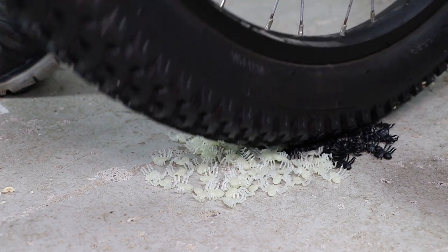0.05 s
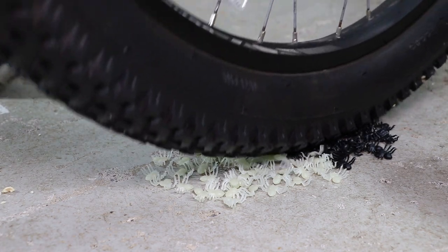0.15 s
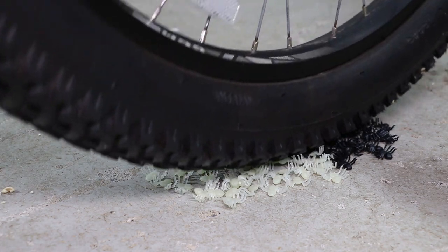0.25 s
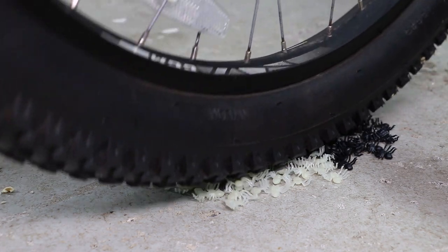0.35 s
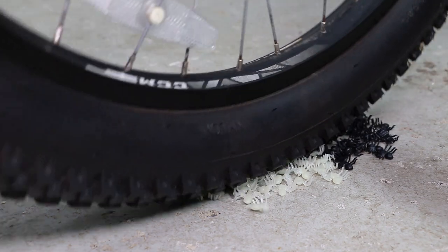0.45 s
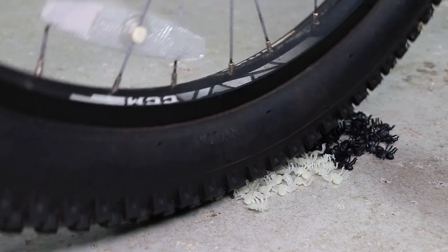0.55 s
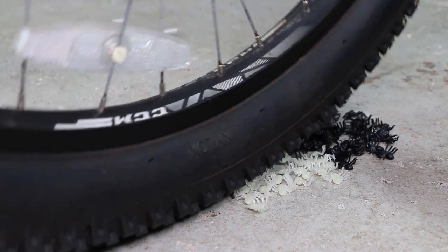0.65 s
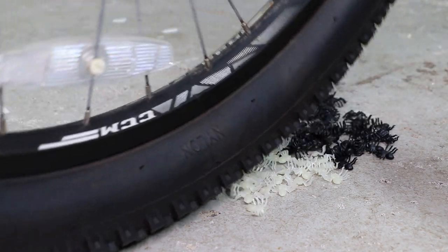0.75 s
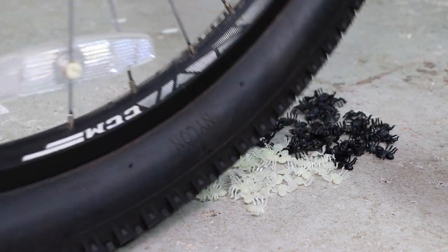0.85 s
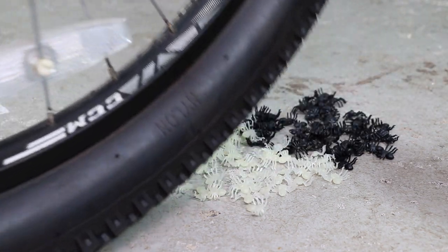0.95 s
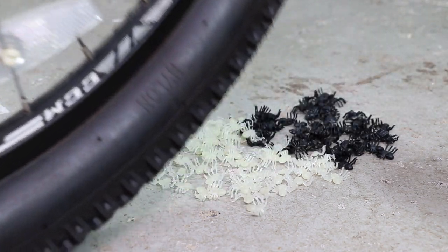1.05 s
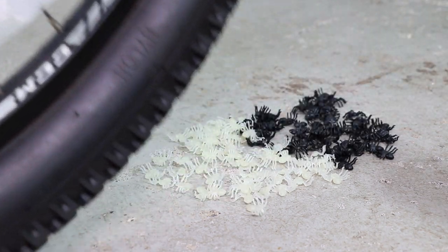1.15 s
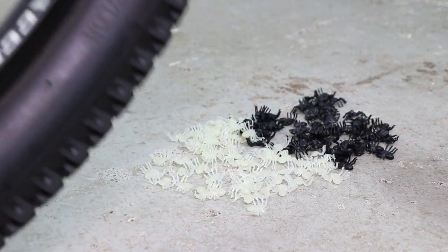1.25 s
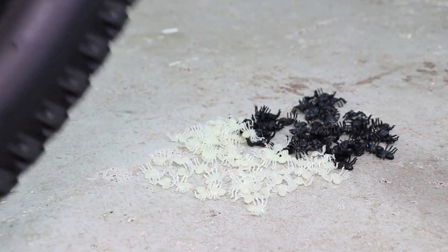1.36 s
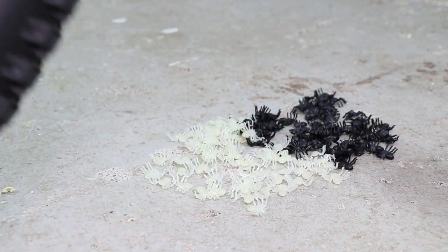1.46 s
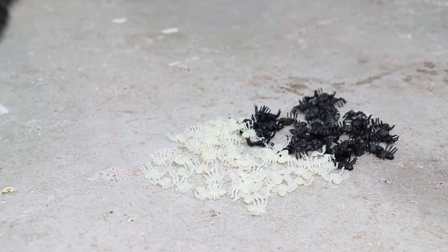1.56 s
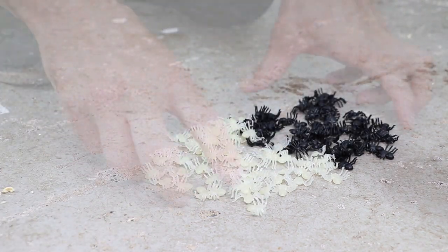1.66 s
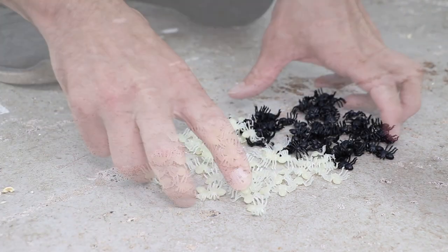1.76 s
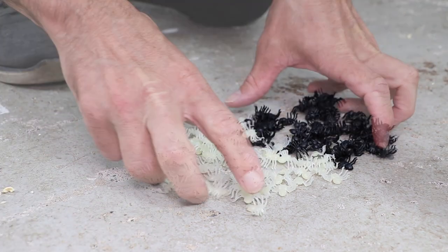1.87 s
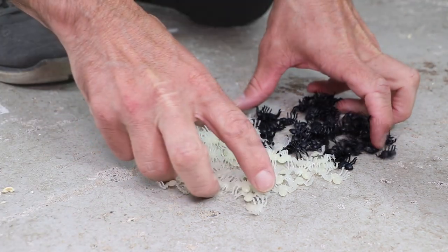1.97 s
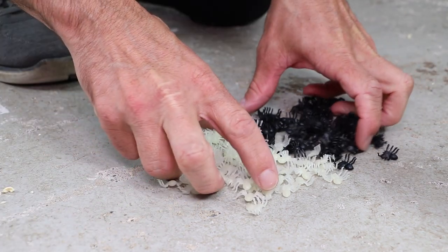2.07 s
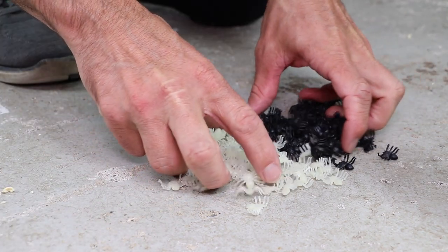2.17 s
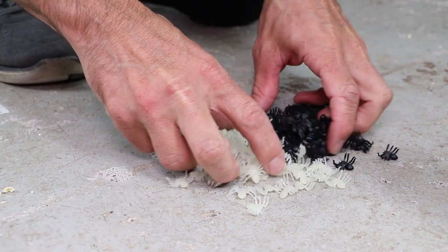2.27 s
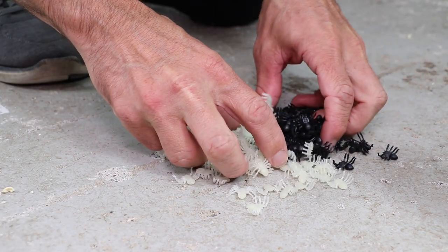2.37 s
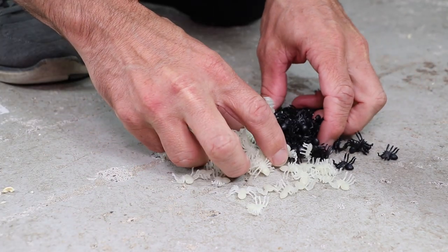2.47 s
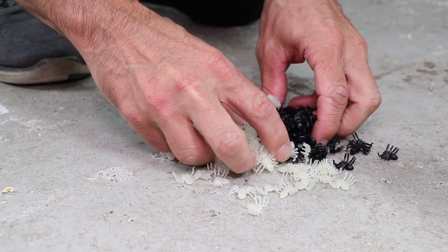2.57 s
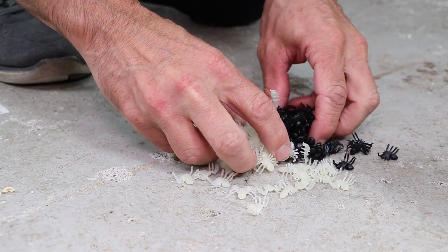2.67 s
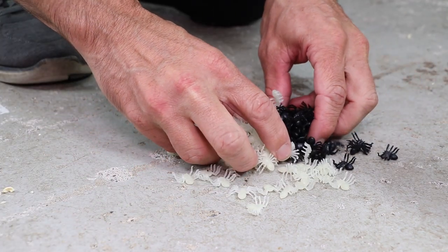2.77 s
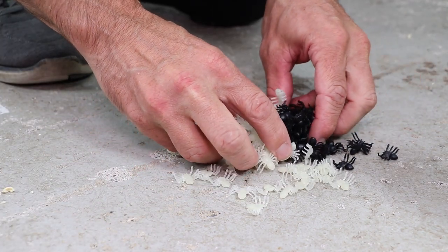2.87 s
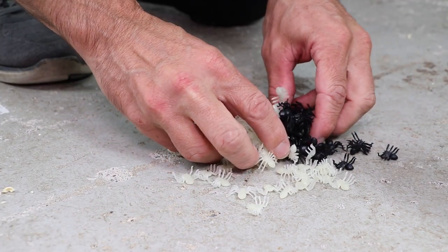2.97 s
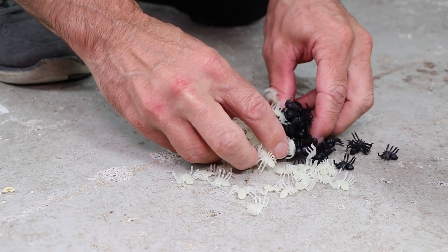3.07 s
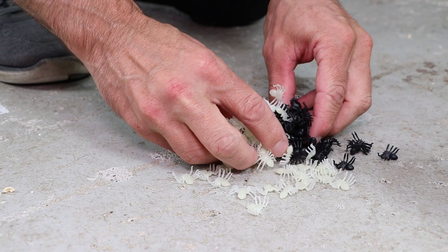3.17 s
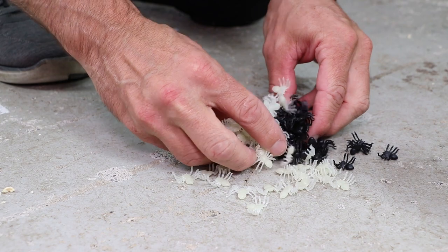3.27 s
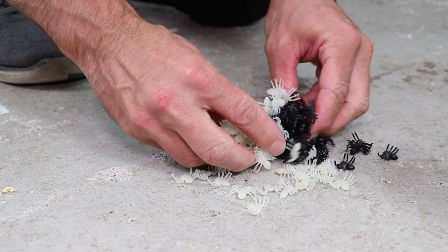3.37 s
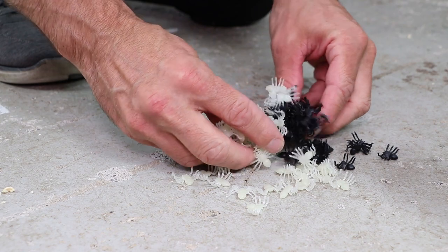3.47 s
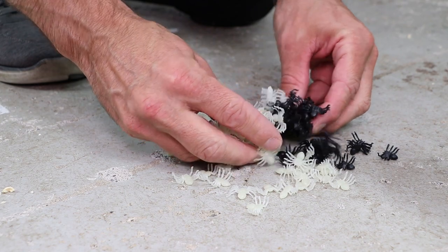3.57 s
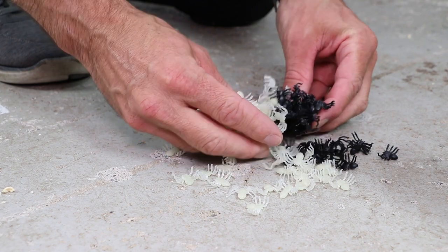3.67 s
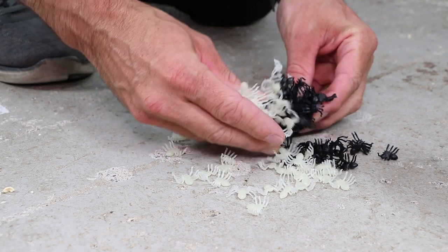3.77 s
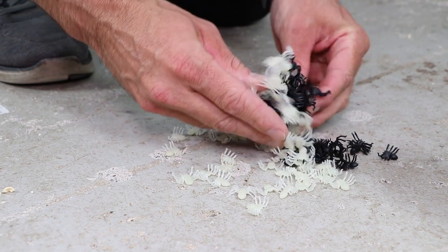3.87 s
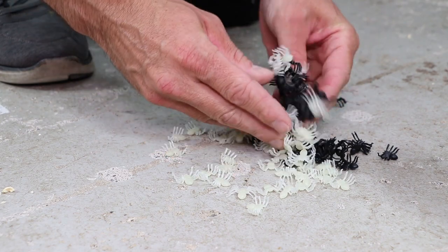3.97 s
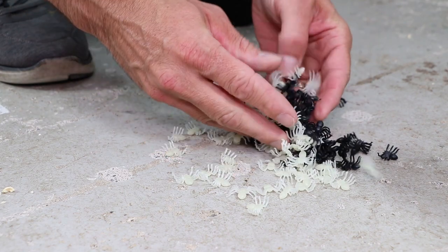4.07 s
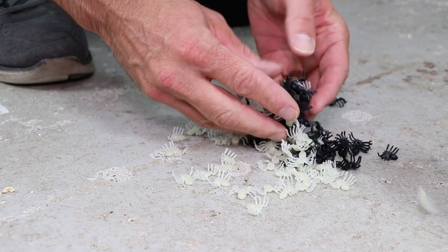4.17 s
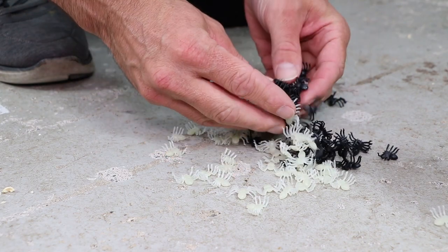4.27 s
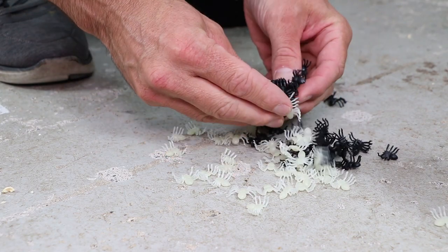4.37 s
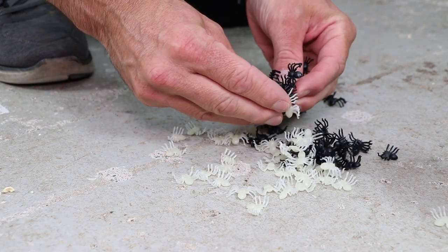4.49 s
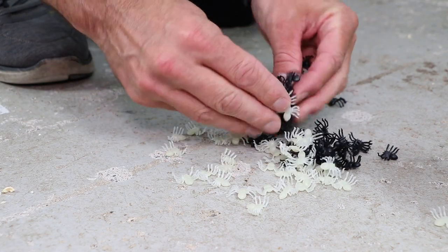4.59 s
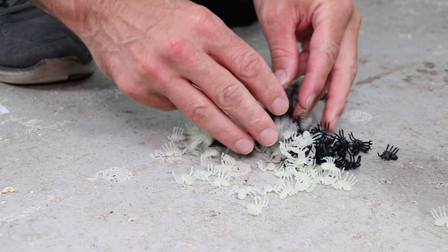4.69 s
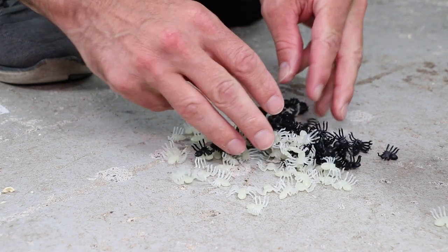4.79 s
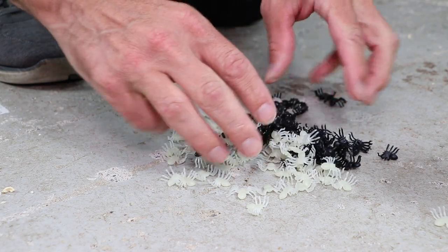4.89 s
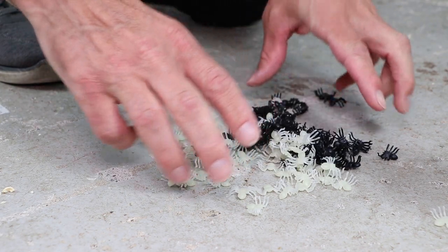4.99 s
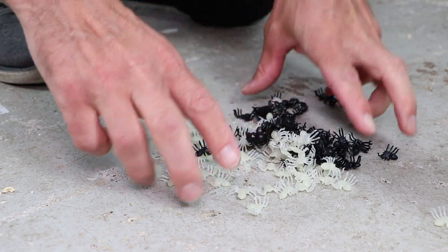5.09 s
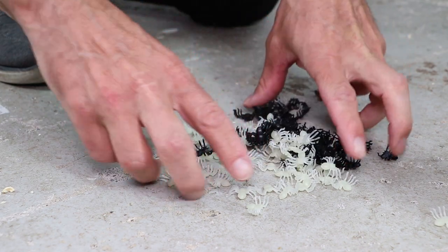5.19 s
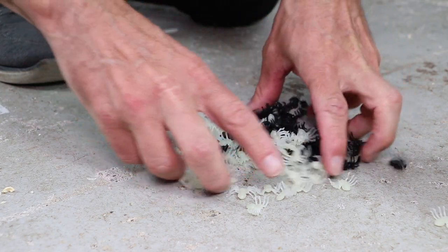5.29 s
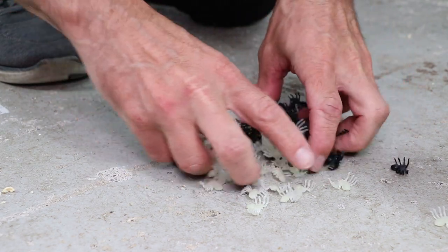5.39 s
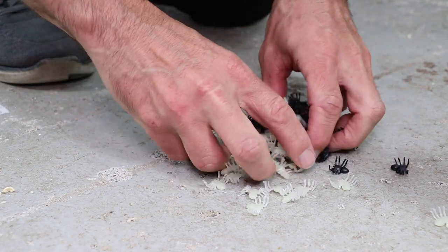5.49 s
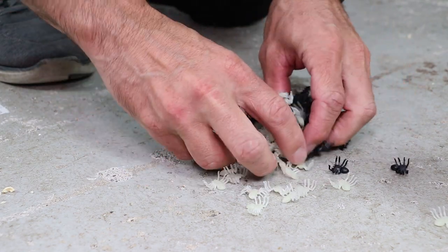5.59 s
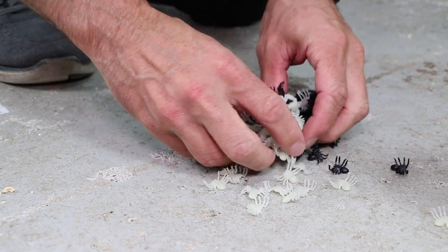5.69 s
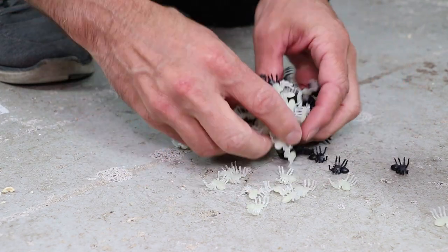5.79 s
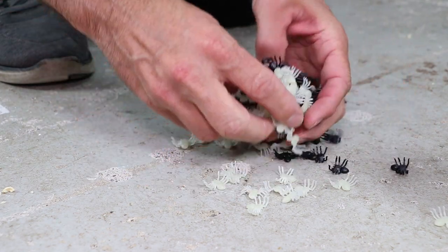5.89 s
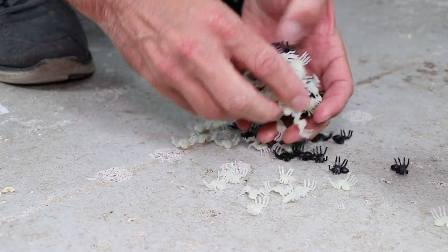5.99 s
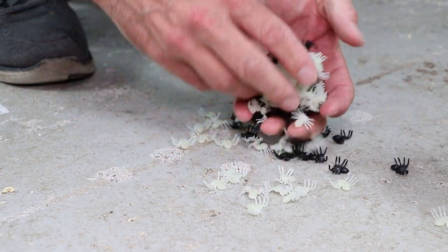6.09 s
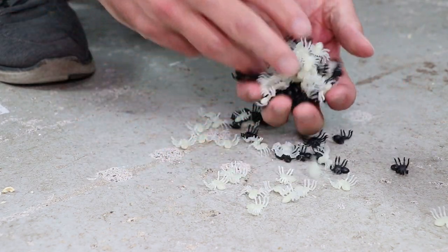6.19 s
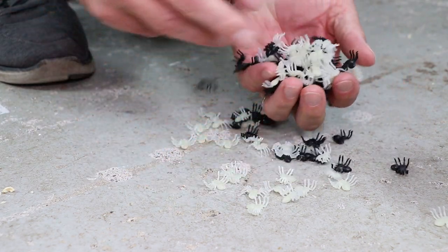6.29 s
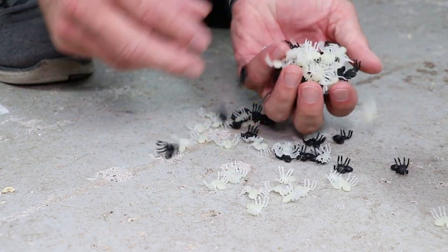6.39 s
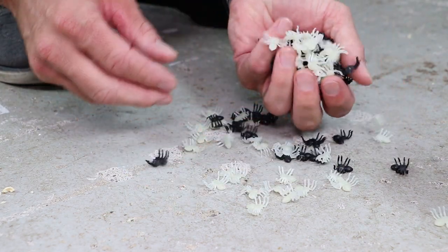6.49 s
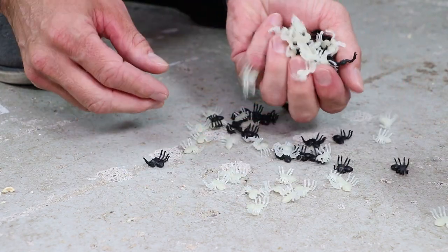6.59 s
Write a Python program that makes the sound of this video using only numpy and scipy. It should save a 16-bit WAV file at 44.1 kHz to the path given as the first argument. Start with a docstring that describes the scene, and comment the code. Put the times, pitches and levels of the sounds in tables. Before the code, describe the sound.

Sharp plastic snaps and gritty crackle under a rolling tyre give way to soft scuffs and bright clicking rustles as fingers gather little toys.

```python
"""Small hard plastic toys snap and grit crackles as a bicycle tyre rolls over a heap of them on a concrete floor.
Then two hands land with soft scuffs and, stroke by stroke, rake the toys together, lift them and let some drop.
A close stereo microphone hears it in a quiet room with a faint hum.
Clicks are short random resonances; grit, rustle and scrape are streams of tiny clicks; rub, scuff,
rumble and air are coloured noise; thumps, squeak and hum are sines."""
import sys
import numpy as np
from scipy import signal
from scipy.fft import rfft, irfft
from scipy.io import wavfile
from scipy.ndimage import uniform_filter1d

SR = 44100
rng = np.random.default_rng(int(sys.argv[2]) if len(sys.argv) > 2 else 0)


def digitize_waveform(pressure):
    """Quantize a signal to 16-bit integers and store it at the path in sys.argv[1].

    Rows of a 2-D input are taken as channels; values are limited to [-1, 1].
    """
    field = np.atleast_2d(pressure).T
    bounded = np.clip(field, -1, 1)
    quanta = np.round(bounded * 32767).astype(np.int16)
    wavfile.write(sys.argv[1], SR, quanta)


N = 293265
TAPS = 1024  # length of a click's spectrum in samples; the click itself lasts half of it
HZ = np.fft.rfftfreq(TAPS, 1 / SR)
TIME = np.arange(N) / SR


def amp(db):
    """Decibels to gain."""
    return 10 ** (np.asarray(db) / 20)


def evened(x):
    """Scales to rms 1."""
    return x / np.sqrt(np.mean(x ** 2) + 1e-20)


def read(points, hz):
    """Reads a table on a log-frequency axis."""
    f, value = np.transpose(points)
    return np.interp(np.log(hz + 1), np.log(f + 1), value)


def level(table, order):
    """Gain over time from one dB column of a curve; silent outside it."""
    rows = np.array(table)
    return amp(np.interp(TIME, rows[:, 0], rows[:, order], left=-np.inf, right=-np.inf))


def swell(start, length, rise_s, fall_s):
    """One push over time: it builds up, holds until its length is over, then dies away."""
    t = TIME - start
    return np.clip(t / rise_s, 0, 1) * np.exp(-np.maximum(t - length, 0) / fall_s)


def pushes(table, rise_s, fall_s, order):
    """Gain over time from one dB column of a table of pushes; the strongest one leads."""
    return np.max([amp(row[order]) * swell(row[0], row[1], rise_s, fall_s) for row in table], axis=0)


def clumps(depth_db, span_s):
    """Contacts come in small avalanches: a gain of rms 1 that swells and drops within span_s."""
    window = signal.windows.hann(int(np.clip(span_s * SR, 16, 8000)))
    wander = evened(signal.oaconvolve(rng.standard_normal(N), window, "same"))
    return evened(amp(depth_db * np.clip(wander, -2, 2)))


def add(mix, s, sound):
    """Mixes a stereo sound in at s seconds."""
    part = mix[:, max(round(s * SR), 0):][:, :sound.shape[1]]
    part += sound[:, :part.shape[1]]


def bump(hz, centre_hz, octaves):
    """Bell curve of height 1 round a resonance."""
    return np.exp(-(np.log2((hz + 1) / centre_hz) / octaves) ** 2)


def ripple(size):
    """Random peaks and dips along the spectrum, size bins wide."""
    return evened(uniform_filter1d(uniform_filter1d(rng.standard_normal(len(HZ)), size), size))


def noise(colour, likeness):
    """Stereo noise of rms 1; likeness is the share of its power common to both microphone ports."""
    hz = np.fft.rfftfreq(N, 1 / SR)
    common = np.sqrt(likeness) * rng.standard_normal(N)
    separate = np.sqrt(1 - likeness) * rng.standard_normal((2, N))
    return evened(irfft(rfft(common + separate) * amp(read(colour, hz)), N))


# How the close stereo microphone hears a click, left port over right. Each row: frequency in Hz, level in dB.
PORT_BALANCE = [(200, 16.5), (500, 4), (1200, 3), (2500, 0), (3500, 0), (4300, 0), (5200, -1), (6000, 6.5),
                (7200, -6.5), (8700, 4), (10500, -0.5), (12500, 4.5), (15500, -6)]
# Phase by which the left port leads. Each row: frequency in Hz, lead in radians.
PORT_LEAD = [(20, 2.2), (1000, 1.13), (2800, 0.59), (4200, 2.87), (5700, 0.63), (7600, 3.3), (10000, 4.33),
             (13000, 4.76), (15500, 7)]


def tick(colour_db, pan_db, modes_db=6.0, path_db=2.0):
    """One causal click of energy 1: the toy's own random modes, then a slightly different path to each port."""
    side = np.array([[.5], [-.5]])
    paths = np.array([ripple(size=18), ripple(size=18)])
    db = colour_db + modes_db * ripple(size=14) + path_db * paths
    db = db + side * (pan_db + read(PORT_BALANCE, HZ))
    # minimum phase: the energy comes as early as the spectrum allows
    log_gain = np.log(amp(np.concatenate([db, db[:, -2:0:-1]], axis=1)))
    spectrum = np.exp(np.conj(signal.hilbert(log_gain)))[:, :len(HZ)]
    spectrum = spectrum * np.exp(1j * side * read(PORT_LEAD, HZ))
    # the lead can place some sound ahead of time zero, so start 4 samples later
    wave = np.roll(irfft(spectrum), 4, axis=1)[:, :TAPS // 2]
    return wave / np.sqrt(np.sum(wave ** 2) / 2)


def grains(colour, per_s, spread_db, pan_db, scatter_db, modes_db=6.5, count=24):
    """Countless tiny contacts of random size, each from one of count differently ringing toys; rms 1."""
    out, colour_db = np.zeros((2, N)), read(colour, HZ)
    for place in np.linspace(-1.7, 1.7, count):
        at = np.flatnonzero(rng.random(N) < per_s / count / SR)
        sizes_db = spread_db * np.minimum(rng.exponential(1, len(at)), 3)
        train = np.zeros(N)
        train[at] = amp(sizes_db) * (-1) ** at  # odd samples push the other way
        click = tick(colour_db, pan_db + scatter_db * place, modes_db)
        out += signal.oaconvolve(train[None], click, axes=1)[:, :N]
    return evened(out)


def snap(colour, db, tilt, ring_hz, pan_db, rattle_db, ring_db, ring_octaves, rattle_s, slip_db, slip_s,
         rebound=0.27):
    """A thin plastic leg drags, slips free with a sharp click, rebounds and chatters; the click falls TAPS samples in."""
    tilt_db = tilt * np.log2(np.maximum(HZ, 600) / 5000)
    colour_db = read(colour, HZ) + tilt_db + ring_db * bump(HZ, ring_hz, ring_octaves)
    t = TIME[:3 * TAPS] - TAPS / SR
    contacts = rng.standard_normal(len(t)) ** 3
    slip = contacts * np.exp(-abs(t) / slip_s) * (t < 0)
    chatter = contacts * np.exp(-abs(t) / rattle_s) * (t > .0005)
    force = amp(slip_db) * slip / np.linalg.norm(slip)
    force = force + amp(rattle_db) * chatter / np.linalg.norm(chatter)
    wave = signal.fftconvolve(force[None], tick(colour_db, pan_db), axes=1)
    for delay_s, size in (0, 1), (rng.uniform(.00015, .0004), rebound):
        click = tick(colour_db, pan_db, modes_db=1.0, path_db=1.5)
        add(wave, TAPS / SR + delay_s, size / np.hypot(1, rebound) * click)
    return amp(db) * np.sqrt(SR / 1000) * wave  # energy 1 becomes rms 1 over 1 ms


def soften(x, strength, full_db, slope, split_hz):
    """Gentle contacts last longer and so lose the treble above split_hz; those at full_db or more keep it."""
    hz = np.fft.rfftfreq(N, 1 / SR)
    top = irfft(rfft(x) / (1 + (split_hz / (hz + 1)) ** 12), N)
    return x - top * (1 - np.minimum(strength / amp(full_db), 1) ** slope)


# Still air of the quiet room. Each row: frequency in Hz, relative density in dB per Hz.
AIR_COLOUR = [(20, 8), (60, -2), (130, -5.5), (300, -11.5), (600, -16), (1200, -22.5), (4000, -27.5),
              (8000, -29), (10500, -30), (15000, -33.5)]


def background(air_db=-63.5, hum_hz=119, hum_db=-76):
    """Still air as coloured noise and a faint hum as one steady sine."""
    hum = np.sqrt(2) * np.sin(2 * np.pi * hum_hz * TIME)
    return amp(air_db) * noise(AIR_COLOUR, likeness=0.12) + amp(hum_db) * hum


# How fast the room dies away. Each row: frequency in Hz, time to fall by 60 dB in s.
ROOM_DECAY = [(150, 0.19), (1000, 0.25), (3000, 0.099), (8000, 0.069), (15000, 0.078)]


def room(x, wet_db=-15):
    """Sparse reflections of random sign, each band dying at its own speed."""
    size = SR // 2
    taps = rng.standard_normal((2, size)) * (rng.random((2, size)) < .1)
    taps = taps * (TIME[:size] > .003)
    hz, t, z = signal.stft(taps, SR, nperseg=256)
    decay = amp(-60 * t / read(ROOM_DECAY, hz)[:, None])
    tail = signal.istft(z * decay, SR, nperseg=256)[1]
    return amp(wet_db) * signal.fftconvolve(x, tail / np.linalg.norm(tail[0]), axes=1)[:, :N]


# Tread knobs, then fingertips, landing on the concrete.
# Each row: start in seconds, level in dB before the rise, decay and panning, ring in Hz.
LANDINGS = [(.172, -50, 137), (0.293, -49, 111), (.71, -52, 109), (.775, -49, 86), (.99, -45, 95),
            (1.059, -57, 75), (1.16, -52, 84), (1.245, -51, 100), (1.403, -41.5, 69.6), (1.889, -48.5, 146),
            (2.133, -54, 160), (2.235, -46, 132), (2.66, -42, 124), (2.829, -41.5, 134),
            (3.049, -47.5, 144), (5.211, -39.5, 112), (5.296, -38, 123), (5.388, -31.5, 112)]


def thumps(rise_s=0.0058, decay_s=0.019, lead_rad=1.6):
    """Each soft landing sets off a few dying low cycles, which reach the left port first."""
    out, t = np.zeros((2, N)), TIME[:8 * TAPS]
    for s, db, hz in LANDINGS:
        envelope = amp(db) * np.minimum(t / rise_s, 1) * np.exp(-t / decay_s)
        cycles = np.sqrt(2) * np.sin(2 * np.pi * hz * t - np.array([[0], [lead_rad]]))
        add(out, s, envelope * cycles)
    return out


# Dull bumps on the floor. Each row: start in seconds, level in dB, ring in Hz, decay in s.
DULL_BUMPS = [(.892, -45.5, 450, 0.0053), (.911, -52, 910, 0.011), (.9995, -55, 750, .005),
              (1.038, -50, 875, 0.009), (1.122, -51.5, 920, 0.013), (1.56, -61, 550, 0.069),
              (1.76, -56.5, 706, 0.04), (2.118, -47, 600, 0.012), (2.15, -49.5, 604, 0.027),
              (2.6, -67.5, 596, .03), (3.232, -53, 700, 0.01), (5.195, -48.5, 500, 0.02),
              (5.21, -54.5, 440, 0.073), (5.39, -41, 710, 0.011), (5.418, -43, 970, .016),
              (5.463, -47, 630, 0.024), (5.53, -54, 740, 0.077), (5.689, -47.5, 910, 0.0091),
              (6.046, -60, 960, 0.018), (6.192, -55.5, 1530, 0.006)]
# Soft colour of skin on concrete, also of the bumps. Each row: frequency in Hz, relative density in dB per Hz.
SCUFF_COLOUR = [(80, -13.5), (200, 6), (330, 1), (520, 0), (750, -4.5), (1100, -9), (2200, -15.5),
                (4000, -29)]


def dull_bumps(ring_db=14, blow=0.35):
    """A soft blow, then a short skid, rings a dull resonance."""
    out, t = np.zeros((2, N)), TIME[:8 * TAPS]
    for s, db, ring_hz, decay_s in DULL_BUMPS:
        colour_db = read(SCUFF_COLOUR, HZ) + ring_db * bump(HZ, ring_hz, 0.86)
        body = tick(colour_db, pan_db=-5.5, modes_db=1, path_db=4.5)
        skid = rng.standard_normal(len(t)) * np.exp(-t / decay_s)
        push = blow * (t == 0) + skid / np.linalg.norm(skid)
        wave = signal.fftconvolve(push[None], body, axes=1)
        add(out, s, amp(db) * evened(wave) * np.sqrt(decay_s * SR / len(t)))
    return out


# Low rumble under the tread, then under the hands. Each row: frequency in Hz, relative density in dB per Hz.
TREAD_COLOUR = [(20, -4.5), (45, -13.5), (80, 7.5), (105, 6), (145, -7), (200, -19), (350, -49),
                (1500, -50)]
RUMBLE_COLOUR = [(20, -2), (45, -5), (80, 3.5), (110, -3), (150, 3.5), (220, -41), (400, -17), (1500, -96)]


def floor_thuds(tread_db=3.0, rumble_db=-2, pan_db=8):
    """Tread, then leaning hands, load the concrete: rumble and thumps, stronger on the left, and dull bumps."""
    tread = amp(tread_db) * level(WHEEL_ROLL, order=3) * noise(TREAD_COLOUR, likeness=0.054)
    leaning = amp(rumble_db) * hand_weight() * noise(RUMBLE_COLOUR, likeness=0.074)
    low = (tread + leaning + thumps()) * amp([[pan_db / 2], [-pan_db / 2]])
    return low + dull_bumps()


def squeak(db=-57, waver=0.014):
    """The rubber sticks and slips in one short squeak: a sine of unsteady pitch."""
    start, length, pitch_hz = .812, .03, 1030
    drift = evened(uniform_filter1d(rng.standard_normal(N), size=130))
    hz = pitch_hz * (1 + waver * drift)
    envelope = amp(db) * swell(start, length, rise_s=.004, fall_s=.008)
    return envelope * np.sin(2 * np.pi * np.cumsum(hz) / SR)


# Toys snapping under the tyre. Each row: start in seconds, click level in dB over 1 ms,
# brightness in dB per octave, ring in Hz, left over right in dB.
TOY_CRACKS = [(0.0368, -34.5, 0, 3530, 8), (0.0421, -39, -8, 13200, 7.5), (0.073, -41, -4.5, 1200, 4),
              (0.0946, -34, -0.5, 1800, 7), (0.106, -29.5, -9, 11270, 1.5), (0.1239, -14, -1, 1850, 2),
              (0.17, -42, -5, 800, 12.5), (0.1795, -18, -5.5, 9500, 3.5), (0.2142, -23.5, -2.5, 1900, 0.5),
              (0.2265, -35.5, -5, 800, 5), (0.2385, -31, -6, 3770, -6), (0.247, -31.5, -5, 2680, 10),
              (0.288, -37, -2, 990, 0), (0.324, -30, -1.7, 1480, 0), (0.3865, -43, -1.5, 2500, 0),
              (0.4148, -32.5, -1.5, 1240, 0), (0.438, -35.5, -7.5, 8400, 9), (0.446, -29.5, -2, 3300, -2),
              (0.4737, -27, -3, 11500, 0), (0.5015, -32, -10, 5510, -4), (0.506, -23, 2.5, 800, -1),
              (0.5448, -28, 9, 4960, 6), (0.558, -28, -0.5, 2200, -4), (0.572, -48, 0.2, 7340, -8),
              (0.5772, -26.5, 13, 3130, -11), (0.582, -21.5, -1.5, 3550, -1.5), (0.637, -41, -9, 3550, -6),
              (0.7144, -37, -3.5, 1200, -4), (0.8612, -43.5, -5, 800, -7), (0.9998, -42.5, -14, 7340, -10),
              (1.0382, -35.5, -8, 860, -10), (1.122, -33, -5.5, 810, -12)]
# The wheel rolling over the heap and away. Each row: time in seconds, then grit, fine hiss
# and tread rumble in dB, all before the trims in the functions.
WHEEL_ROLL = [(0, -55.5, -60.5, -70.5), (.2, -53, -70, -59.5), (.4, -55, -57.5, -63.5),
              (.55, -53, -48, -59.5), (.68, -63, -60.5, -72), (.78, -56, -60, -59.5),
              (.96, -60.5, -66, -55.5), (1.1, -58, -62.5, -49), (1.35, -57, -57.5, -62.5),
              (1.46, -65, -64, -58.5), (1.72, -64.5, -60, -63.5), (1.85, -68, -74, -82)]
# Short swells of grit and crackle. Each row: start in seconds, length in s,
# grit in dB, fine crackle in dB, both before the trims.
GRIT_SWELLS = [(.105, 0.062, -51, -48.5), (.205, 0.029, -61, -47), (.43, 0.093, -56, -59),
               (.51, 0.015, -47.5, -53), (.63, 0.01, -54.5, -54), (.80, 0.017, -52.5, -55),
               (1.54, 0.043, -61, -55), (1.63, 0.011, -75, -51.5), (1.76, 0.0069, -54.5, -57.5)]
# Toys under the tread; beyond them the rubber only rubs on bare concrete. Each row: time in seconds, share 0-1.
TOY_SHARE = [(0, 0.98), (.6, 0.66), (.8, 0.52), (1.9, 0.02)]
# Colours of snapping toys, grit and fine crackle. Each row: frequency in Hz, relative density in dB per Hz.
CRACK_SPECTRUM = [(150, -39.5), (600, -18), (1000, -13.5), (1900, -2.5), (3000, -7), (4200, -9), (6000, 3),
                  (8300, 5), (10300, -6), (12500, -2.5), (15000, -4.5), (18000, -20)]
GRIT_COLOUR = [(200, -31.5), (380, -7.5), (560, -1.5), (800, -1.5), (1200, -1), (2000, -4.5), (3200, -8.5),
               (6000, -14), (15000, -28.5)]
CRACKLE_COLOUR = [(1500, -7.5), (3200, 4), (4500, 1.5), (7000, 2), (10000, -1.5), (15000, -12.5)]


def tyre(grit_db=-1.5, crackle_db=-2.5, chip_db=-3):
    """Toys crack one by one over crunching grit and small ticks of bending legs; then the rubber hisses on."""
    rise_s, fall_s = 0.017, 0.037
    coarse = np.hypot(level(WHEEL_ROLL, order=1), pushes(GRIT_SWELLS, rise_s, fall_s, order=2))
    fine = np.hypot(level(WHEEL_ROLL, order=2), pushes(GRIT_SWELLS, rise_s, fall_s, order=3))
    coarse, fine = amp(grit_db) * coarse, amp(crackle_db) * fine
    grit = grains(GRIT_COLOUR, per_s=650, spread_db=5.5, pan_db=0, scatter_db=3, modes_db=5)
    crackle = grains(CRACKLE_COLOUR, per_s=800, spread_db=5.5, pan_db=0, scatter_db=3)
    chips = amp(chip_db) * grains(CRACK_SPECTRUM, per_s=130, spread_db=4.5, pan_db=-3, scatter_db=3)
    crunch = (coarse * grit + fine * crackle) * clumps(depth_db=3.5, span_s=0.0122) + fine * chips
    rub = coarse * noise(GRIT_COLOUR, likeness=0.53) + fine * noise(CRACKLE_COLOUR, likeness=0.16)
    share = np.interp(TIME, *np.transpose(TOY_SHARE))
    out = np.sqrt(share) * crunch + np.sqrt(1 - share) * rub
    out = soften(out, fine, full_db=-63.5, slope=0.45, split_hz=3500)
    for s, db, tilt, ring_hz, pan_db in TOY_CRACKS:
        crack = snap(CRACK_SPECTRUM, db, tilt, ring_hz, pan_db, rattle_db=-12, ring_db=14.0,
                     ring_octaves=0.58, rattle_s=0.0011, slip_db=-8.5, slip_s=0.00073)
        add(out, s - TAPS / SR, crack)
    return out


# Finger strokes through the heap. Each row: start in seconds, length in s, then toys stirring,
# toys scraping and weight on the floor in dB, all before the trims in the functions.
FINGER_STROKES = [(1.875, 0.24, -62, -78, -56.5), (2.11, 0.063, -59, -61, -45), (2.19, .1, -57, -60, -53),
                  (2.30, 0.14, -47, -59, -52.5), (2.46, 0.054, -54.5, -73, -53.5),
                  (2.59, 0.097, -53, -57.5, -51.5), (2.82, 0.053, -75, -71, -55),
                  (2.885, 0.084, -73, -62.5, -58), (3.0, 0.047, -43, -49.5, -54.5),
                  (3.09, 0.02, -49, -65, -58.5), (3.2, 0.053, -58, -55, -47.5),
                  (3.325, 0.056, -42, -50.5, -51.5), (3.495, 0.068, -46.5, -56.5, -60.5),
                  (3.63, .12, -52.5, -62, -73), (3.81, 0.16, -48, -61.5, -77),
                  (3.95, 0.056, -45.5, -54.5, -82), (4.03, 0.13, -48, -56, -70.5),
                  (4.335, 0.048, -53.5, -59, -83), (4.43, 0.22, -57.5, -64, -74),
                  (4.69, 0.12, -51, -62.5, -68), (4.76, 0.062, -44, -52, -63.5),
                  (5.185, 0.22, -62, -62, -51.5), (5.335, 0.042, -53.5, -59, -58),
                  (5.37, 0.097, -44, -48.5, -40), (5.45, 0.12, -43, -49, -51.5),
                  (5.595, 0.15, -41, -48, -45.5), (5.79, 0.16, -49, -57.5, -77),
                  (6.04, 0.019, -43.5, -50, -81), (6.19, 0.073, -56, -65, -68),
                  (6.495, 0.11, -50.5, -57.5, -65)]
STROKE_RISE_S, STROKE_FALL_S, WEIGHT_FALL_S = 0.01, 0.058, 0.036


def hand_weight():
    """How hard the hands lean on the floor, as a gain over time."""
    return pushes(FINGER_STROKES, STROKE_RISE_S, WEIGHT_FALL_S, order=4)


# Toys shift faintly as long as the hands hold them.
# Each row: start in seconds, length in s, level in dB before the trims.
HAND_HOLDS = [(2.06, 2.78, -55), (5.34, 2.1, -55)]
# The sharpest clicks of toys in the hands and on the floor. Each row: start in seconds, level in dB over 1 ms
# before the click trim, brightness in dB per octave, knock in dB, rattle in dB beside the click.
TOY_CLICKS = [(2.056, -40, 2, -4, -31), (2.1357, -40, -6, -11, -11), (2.3309, -36, -1.5, 2, 2),
              (2.6714, -29.5, -4, -13, -1), (2.7033, -39, 8, 0, -18), (2.7462, -35, -2.5, -6, -7),
              (2.8267, -33.5, -3, 1, 7), (2.8721, -30, -4.5, -11, -7), (2.9223, -31, 1, 0, -27),
              (2.9555, -29.5, -3, 3.5, 0), (3.0057, -29.5, 2, 30.5, -11), (3.0777, -29, -4, 7.5, -15),
              (3.1962, -32, -2.5, 4, 6), (3.231, -28.5, -4.5, 13.5, -0.5), (3.2399, -31, 11, 0, -5),
              (3.249, -26, -6, -5.5, -15), (3.2986, -30.5, -1, -7, -23), (3.3488, -23, 0, 14.5, -15),
              (3.3694, -26, -1, 3, -6), (3.3962, -28, -1, 13, -1.5), (3.4197, -27, -1.5, 5, -20),
              (3.4582, -33.5, 3, 12, -1), (3.4837, -33, -2, 1, 3), (3.5187, -26, -1, 10, -20),
              (3.5306, -26, -3, 0, -8), (3.5856, -29, -3, -20, -5), (3.6887, -24.5, 3.5, -4, -18),
              (3.7634, -29, 0, -2, -12), (3.7986, -38.5, -1.5, 6, -15), (3.8231, -35, -2.5, -11.5, 5),
              (3.8575, -24, -1.5, -5, -20), (3.8927, -25, -4, -20, -10), (3.9716, -36, 4, 2, 8),
              (4.1441, -35, -5.5, -2, 5), (4.1582, -23, -2, -6, -18), (4.3395, -21, -3, -12, -12),
              (4.4794, -32, 1.5, -4, -2), (4.511, -33, 3.5, 26, -15), (4.5358, -27, 4, 16, -11),
              (4.5499, -27.5, 6, 0, -22), (4.5812, -38, -1.5, 2, 5), (4.5915, -25, 7, -4, -13),
              (4.615, -34, 2.5, 23, -13), (4.629, -32, 1, 14, -7), (4.6732, -31.5, 5, 12, -0.5),
              (4.7662, -34, 7, 3, -5), (4.8101, -30.5, -5, 1.5, 0), (5.3961, -37, -4.5, 7, -15),
              (5.6258, -32.5, 0, 19, 7.5), (5.6905, -18, 5, 29, 3.5), (5.726, -22.5, 1, 9, -4.5),
              (5.8394, -30, 3, 4, -16), (5.9215, -30, -2.1, 5.5, 2), (6.0458, -11, -1.9, 5.5, -7.5),
              (6.2036, -42.5, 0.5, 20, 9), (6.2237, -35.5, 1, 8, 3), (6.3531, -35, -2, -10, 1.5),
              (6.4077, -30, 6, -25, -5), (6.4704, -35.5, 0.5, 9, -3), (6.5278, -26.5, 2.5, 20, -20),
              (6.5328, -14, 10, 18, -16), (6.5794, -30.5, 0, 11, -12), (6.6252, -27, 6.5, 0, -10)]
# Colours of clicking, stirring and scraping toys. Each row: frequency in Hz, relative density in dB per Hz.
CLICK_SPECTRUM = [(150, -56.5), (600, -28.5), (1000, -23.5), (1900, -14), (3000, -11.5), (4200, -8.5),
                  (6000, 1), (8300, 6.5), (10300, -1.5), (12500, 3.5), (15000, -2), (18000, -35)]
STIR_COLOUR = [(600, -36), (1500, -23), (3000, -10.5), (4200, -7), (6000, 1), (8500, 3), (10300, -5.5),
               (12500, -1.5), (15500, -9), (18000, -63.5)]
SCRAPE_COLOUR = [(300, -17.5), (700, -10), (1150, -11), (1700, 0), (2200, -2), (3200, 2), (5000, -0.5),
                 (12000, -49.5)]


def hands(click_db=-1.0, stir_db=1.5, catch_db=-57, scrape_db=-1.5, scuff_db=-9, held_scrape_db=-18.5):
    """Toys rustle, scrape against one another and click as they catch or fall; skin scuffs the floor."""
    rustle = amp(stir_db) * grains(STIR_COLOUR, per_s=1500, spread_db=5, pan_db=0, scatter_db=4)
    catches = grains(CLICK_SPECTRUM, per_s=80, spread_db=3.5, pan_db=4, scatter_db=2)
    scrape = grains(SCRAPE_COLOUR, per_s=1200, spread_db=4.5, pan_db=1, scatter_db=2, modes_db=2.5)
    scrape = amp(scrape_db) * scrape
    holding = pushes(HAND_HOLDS, rise_s=0.067, fall_s=0.087, order=2)
    stirring = np.hypot(pushes(FINGER_STROKES, STROKE_RISE_S, STROKE_FALL_S, order=2), holding)
    # held toys scrape less than they stir
    held_scraping = amp(held_scrape_db) * holding
    scraping = np.hypot(pushes(FINGER_STROKES, STROKE_RISE_S, STROKE_FALL_S, order=3), held_scraping)
    out = (stirring * rustle + scraping * scrape) * clumps(depth_db=-0.07, span_s=0.0092)
    out = soften(out, stirring, full_db=-58.5, slope=0.97, split_hz=8300)
    # hooked legs flick free with much the same force however gently the heap is stirred
    out += amp(catch_db) * holding / holding.max() * catches
    scuff = noise(SCUFF_COLOUR, likeness=0.61) * clumps(depth_db=1.5, span_s=0.019)
    out += amp(scuff_db) * hand_weight() * scuff
    for s, db, tilt, knock_db, rattle_db in TOY_CLICKS:
        # the heap lies a little to the left, with some scatter
        pan_db = 2.5 + 2.5 * rng.standard_normal()
        # a toy that meets something hard knocks with its whole body, near 1110 Hz
        click = snap(CLICK_SPECTRUM, db + click_db, tilt, 1110, pan_db, rattle_db, ring_db=knock_db,
                     ring_octaves=0.84, rattle_s=0.0046, slip_db=-4.5, slip_s=0.001)
        add(out, s - TAPS / SR, click)
    return out


def scene():
    """Tyre, then hands, in the room, over the floor's thuds and the still air."""
    toys = tyre() + squeak() + hands()
    return toys + room(toys) + floor_thuds() + background()


def record(dry):
    """The sharpest peaks are rounded off; then the recorder's band limit."""
    ceiling, edge_hz = .85, 16250
    rounded = dry / (1 + (dry / ceiling) ** 4) ** .25
    low_pass = signal.firwin(301, edge_hz, window=("kaiser", 9), fs=SR)
    return signal.oaconvolve(rounded, low_pass[None], "same")


dry = scene()
out = record(dry)
digitize_waveform(out)
```